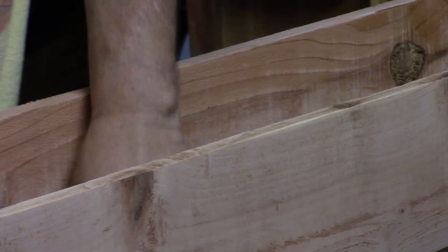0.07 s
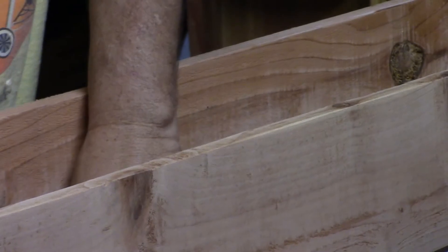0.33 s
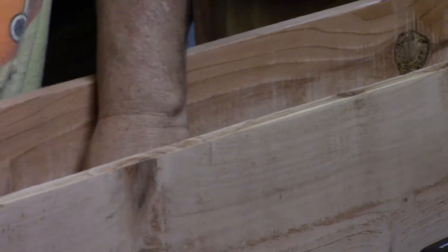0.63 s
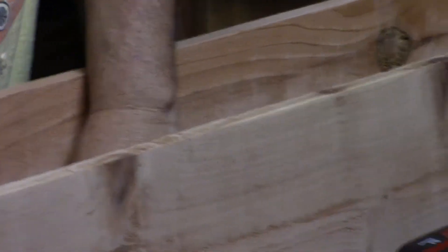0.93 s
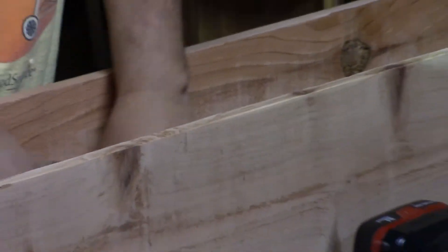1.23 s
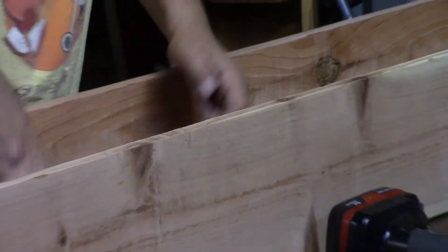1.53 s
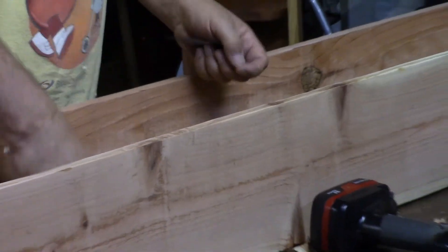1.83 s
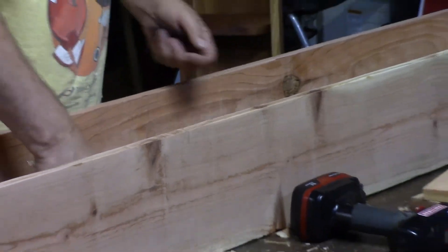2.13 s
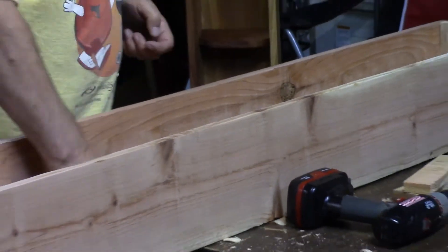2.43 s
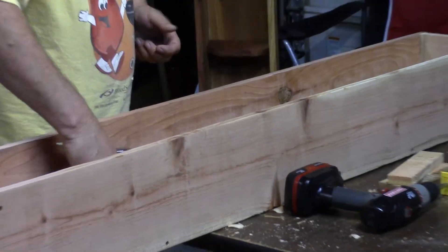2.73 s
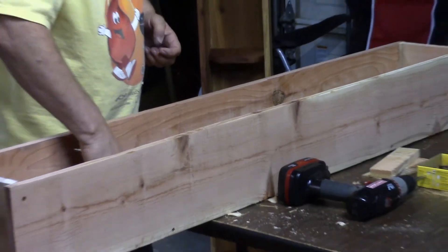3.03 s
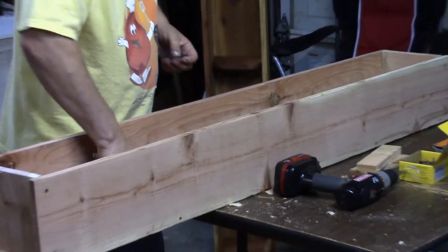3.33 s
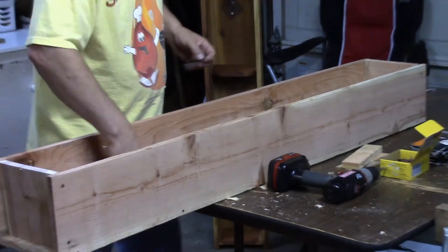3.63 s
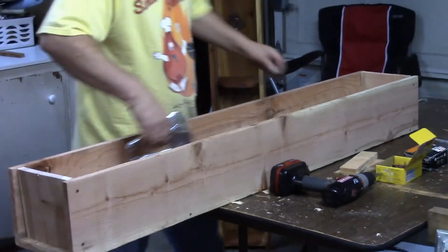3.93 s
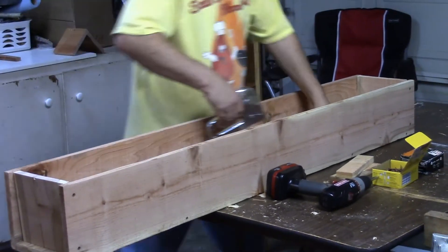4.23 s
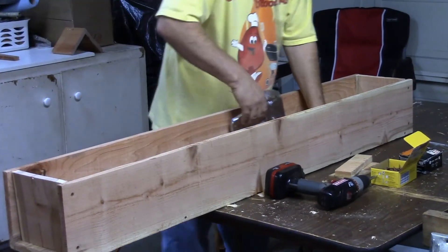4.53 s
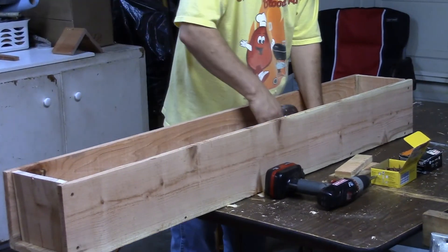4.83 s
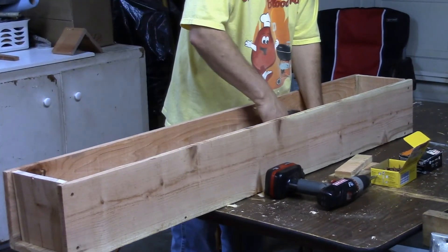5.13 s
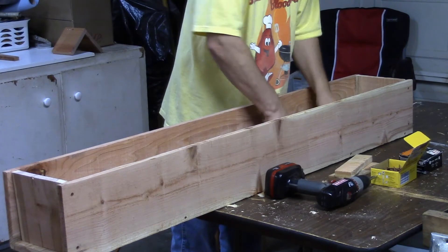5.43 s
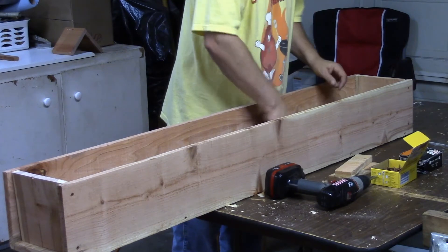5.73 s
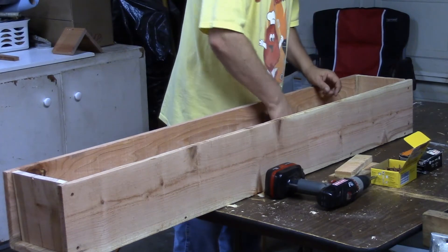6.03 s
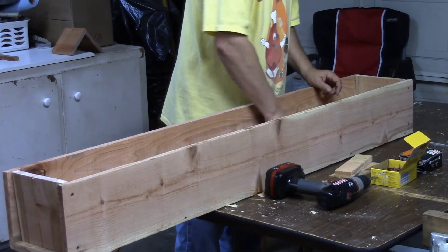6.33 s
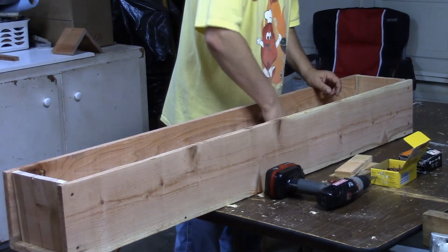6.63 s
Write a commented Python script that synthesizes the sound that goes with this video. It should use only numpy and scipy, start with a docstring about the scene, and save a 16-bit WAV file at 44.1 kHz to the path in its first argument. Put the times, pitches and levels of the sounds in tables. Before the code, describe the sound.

Six loud metallic clacks of a hand stapler hitting wood in a workshop, each followed by a small click of the handle.

```python
"""A hand staple gun fires six staples through netting into a long wooden planter box in a workshop.
The gun is set down, rocks flat and sometimes brushes the box. Each squeeze presses its nose into the
board, the latch slips, the spring slams the staple home and the handle clicks back. The room rings for
about 0.4 s over a faint, steady background noise. The camera's microphone gets quieter as the lens
zooms out, and its limiter (an automatic volume control) flattens the shots."""
import sys
import numpy as np
from scipy import signal
from scipy.fft import rfft, irfft
from scipy.io import wavfile
from scipy.ndimage import uniform_filter1d, minimum_filter1d

SR = 44100
rng = np.random.default_rng(int(sys.argv[2]) if len(sys.argv) > 2 else 0)


def transcribe(signal):
    """Save signal, clipped to [-1, 1], as a 16-bit WAV file at the path in sys.argv[1]."""
    frames = np.atleast_2d(signal).T
    limited = np.clip(frames, -1, 1)
    pcm = np.round(limited * 32767).astype(np.int16)
    wavfile.write(sys.argv[1], SR, pcm)


N = 303849
TIME = np.arange(25600) / SR  # time axis of one hit [s]
HZ = np.fft.rfftfreq(len(TIME), 1 / SR)
RATTLE_LAG_S = 0.0014  # loose steel parts tick this long after the gun meets the wood

# notes the wooden box boosts or swallows: (frequency [Hz], width [Hz], gain [dB])
BOX_NOTES = [(178, 15, 2), (223, 14, -8), (260, 8.4, 1), (259, 9.7, -4.5), (303, 13, 3.5), (473, 60, 1),
             (562, 20, 4), (624, 40, -5.5), (638.5, 26, 5.5), (845, 33, 7), (930, 100, -1), (1067, 34, 9.5),
             (1175, 60, -0.5), (1250, 71, 4.5), (1410, 80, -0.5), (1680, 45, 0)]
# tone of steel striking steel: (frequency [Hz], relative level [dB])
CRACK_TONE = [(40, -45), (120, -28), (300, -13.5), (800, 4), (2000, -11), (3500, 1.5), (5500, -5),
              (7000, -3.5), (9500, 2.5), (12000, -7), (16000, -19.5)]
# tone of the gun's casing meeting wood or its stop: (frequency [Hz], relative level [dB])
CLACK_TONE = [(30, -44), (90, -30), (200, -11), (500, 8.5), (1100, 5.5), (1500, -2.5), (2000, 0.5),
              (2700, -2.5), (3500, -11), (4500, -18), (9000, -31.5), (16000, -43)]


def amp(db):
    """Turns decibels into a factor to multiply by."""
    return 10 ** (np.asarray(db) / 20)


def curve(points, hz=HZ):
    """Joins a table's points with straight lines on a log-frequency axis."""
    point_hz, value = np.transpose(points)
    return np.interp(np.log(hz + 1), np.log(point_hz + 1), value)


def add(mix, start_s, sound):
    """Mixes a sound in at its start time."""
    part = mix[:, round(start_s * SR):][:, :sound.shape[1]]
    part += sound[:, :part.shape[1]]


def colour(sound, db):
    """Gives each frequency in HZ its own gain, so that the ringing follows the hit (minimum phase)."""
    log_gain = np.log(amp(db))
    mirrored = np.concatenate([log_gain, log_gain[-2:0:-1]])
    response = np.exp(np.conj(signal.hilbert(mirrored)))[:len(HZ)]
    return irfft(rfft(sound) * response)


def same_power(db):
    """Shifts a tone curve so that it changes the tone of white noise but not its power."""
    return db - 10 * np.log10(np.mean(amp(db) ** 2))


def bass_treble(low_db, high_db, low_hz, high_hz):
    """A bass knob and a treble knob, as a curve in dB."""
    return low_db / (1 + (HZ / low_hz) ** 2) + high_db * HZ ** 2 / (HZ ** 2 + high_hz ** 2)


def resonances(notes):
    """An object boosts some notes and swallows others: peaks and dips in dB."""
    return sum(db / (1 + (2 * (HZ - hz) / width) ** 2) for hz, width, db in notes)


def ripple(grain_hz, depth_db):
    """Every spot and grip favours other notes: random wiggles in the tone curve, in dB."""
    bell_curve = np.exp(-(np.arange(-400, 401) * HZ[1] / grain_hz) ** 2)
    wiggles = signal.oaconvolve(rng.standard_normal(len(HZ)), bell_curve, "same")
    return depth_db * wiggles / wiggles.std()


def scatter():
    """Noise spectra for a spray of echoes: mid (what both ears share) and side (how they differ)."""
    # stereo width: (frequency [Hz], side level relative to mid [dB])
    width = [(30, -5), (80, -26), (170, -32.5), (400, -32), (1400, -23), (2800, -18.5), (5600, -15.5),
             (10000, -13), (14000, -10.5)]
    spectra = rfft(rng.standard_normal((2, len(TIME))))
    spectra[1] *= amp(curve(width))
    return spectra


def background(level_db=-60, side_db=-14):
    """Steady room noise, nearly the same in both ears."""
    # tone of the room noise: (frequency [Hz], relative level [dB])
    air_tone = [(15, -63.5), (25, -35.5), (92, -21.5), (127, -8.5), (200, -12), (242, -2.5), (277, -10.5),
                (489, -9.5), (1020, -21.5), (1290, -23), (1840, -25.5), (2280, -29), (2910, -28.5),
                (11300, -43.5), (16000, -54.5)]
    hz = np.fft.rfftfreq(N, 1 / SR)
    noise = irfft(rfft(rng.standard_normal((2, N))) * amp(curve(air_tone, hz)), N)
    return amp(level_db) * noise / noise[0].std() * amp([[0], [side_db]])


def room_echo():
    """The room answers a hit: treble builds up quickly, bass swells, each band fades at its own speed."""
    # the workshop's echo: (band centre [Hz], time to fade by 60 dB [s], build-up time [s])
    bands = [(102.6, 0.38, 0.024), (307, 0.46, 0.0049), (780, 0.39, 0.0095), (2240, 0.41, 0.0034),
             (5640, 0.38, 0.0046), (10400, 0.31, 0.0017), (15000, 0.3, 0.0032)]
    spectra, echo = scatter(), 0
    centres = [row[0] for row in bands]
    for share, (_, fade_s, rise_s) in zip(np.eye(len(bands)), bands):
        band = irfft(spectra * curve(np.c_[centres, share]))
        echo += band * (1 - np.exp(-TIME / rise_s)) * amp(-60 * TIME / fade_s)
    return echo


def chatter(rise_s, decay_s):
    """Parts chatter against each other, making a short burst of noise."""
    shape = (1 - np.exp(-(TIME / rise_s) ** 2)) * np.exp(-TIME / decay_s)
    return irfft(scatter()) * shape / shape.max()


def wood_knock(note_hz, note_db, boom_db, treble_db):
    """A blunt touch shakes mostly the boards' low notes; the spot it hits boosts or dulls one."""
    # tone of a knock on wood: (frequency [Hz], relative level [dB])
    knock_tone = [(30, -40.5), (80, -27.5), (160, -3), (280, 1), (480, -1), (750, -6), (1200, -18.5),
                  (2500, -22), (4000, -35.5), (10000, -38), (16000, -48.5)]
    body_db = same_power(curve(knock_tone) + resonances(BOX_NOTES))
    spot_db = resonances([(note_hz, 45, note_db)]) + ripple(grain_hz=39.54, depth_db=2.5)
    blow = room_echo() + amp(-6) * chatter(rise_s=0.0015, decay_s=0.014)
    return colour(blow, body_db + spot_db + bass_treble(boom_db, treble_db, low_hz=300, high_hz=1190))


def steel_ring(detune=0.004, spread_db=0.5):
    """The gun's steel body and spring ring; the grip shifts their notes a little on every hit."""
    # notes of the steel: (frequency [Hz], level [dB], time to fade by 60 dB [s])
    steel_notes = [(1314, -16.5, .35), (1478, -27.5, 0.67), (1683, -23.5, 0.37), (1839, -25.5, 0.36),
                   (2310, -23.5, 0.18), (2673, -19, 0.26), (3114, -23.5, 0.46), (3180, -26.5, 0.43),
                   (3430, -19.5, 0.31), (4020, -31, 0.54), (4440, -29, 0.31)]
    hz, db, fade_s = np.transpose(steel_notes)[:, :, None]
    shift, size, phase = rng.standard_normal((len(steel_notes), 3)).T[:, :, None]
    loudness = amp(db + spread_db * size) * amp(-60 * TIME / fade_s)
    notes = loudness * np.sin(2 * np.pi * (hz * (1 + detune * shift) * TIME + phase))
    return np.outer([1, 0], notes.sum(0) * (1 - np.exp(-TIME / 0.001)))  # mid only


def steel_click(low_db, treble_db, tick_db, ring_db=-8):
    """Steel parts touch lightly: a tick through the handle, its echo and a faint ring."""
    # tone of the click's echo: (frequency [Hz], relative level [dB])
    click_tone = [(60, -32.5), (200, -12), (500, 1), (900, -4), (1400, -3.5), (2500, -1.5), (4500, -3.5),
                  (8000, -5), (11000, -9), (16000, -26)]
    # notes the handle boosts or swallows: (frequency [Hz], width [Hz], gain [dB])
    handle_notes = [(1350, 220, 6), (1700, 230, -4), (2000, 130, 2), (2350, 310, 3), (3100, 110, 1),
                    (3470, 95, 2), (5030, 300, -2.5), (8600, 78, 2), (9900, 300, 2.5)]
    handle_db = resonances(handle_notes)
    grip_db = ripple(grain_hz=110, depth_db=2.5)
    tilt_db = bass_treble(low_db, treble_db, low_hz=1500, high_hz=5000)
    echo = colour(room_echo(), same_power(curve(click_tone) + handle_db) + grip_db + tilt_db)
    contact = chatter(rise_s=0.0014, decay_s=0.0053)
    tick = colour(contact, same_power(curve(CRACK_TONE) + handle_db) + grip_db)
    return echo + amp(tick_db) * tick + amp(ring_db) * steel_ring()


def ping(hz, decay_s=0.0035):
    """One note of the gun's casing that dies away quickly."""
    note = np.sin(2 * np.pi * hz * TIME) * (1 - np.exp(-TIME / 0.001)) * np.exp(-TIME / decay_s)
    return np.outer([1, 0], note)  # mid only


def casing_clack(ping_hz, direct_db=4, ping_db=11, ring_db=1):
    """The casing meets wood: a hard clack, a ping and a trace of ringing steel."""
    blow = room_echo() + amp(direct_db) * chatter(rise_s=0.0013, decay_s=0.0033)
    hit = colour(blow, same_power(curve(CLACK_TONE)) + ripple(grain_hz=90, depth_db=3.0))
    return hit + amp(ping_db) * ping(ping_hz) + amp(ring_db) * steel_ring()


def setting_down():
    """One edge touches the board, then the gun rocks flat with a clack; loose parts tick both times."""
    # the gun meeting the board: (time [s], rocking time [s], touch knock [dB], touch tick [dB],
    # landing knock [dB], landing tick [dB], clack [dB], ping [Hz], bass gain [dB],
    # note of the spot [Hz], gain of that note [dB])
    set_downs = [(.2, 0.037, -53, -74.5, -48.5, -70.5, -64, 2360, 12.5, 240, 6),
                 (0.57, 0.013, -50.5, -66.5, -27.5, -35.5, -47.5, 2440, -6.5, 400, 15),
                 (1.38, .0555, -48, -75.5, -39.5, -53, -51, 2380, 10.5, 245, 7.5),
                 (2.148, .016, -31, -55, -28, -49, -43.5, 2430, 4.5, 252, 9.5),
                 (3.362, 0.0051, -40.5, -49, -34.5, -60.5, -59.5, 2100, -3, 750, 6.5),
                 (5.433, 0.034, -36.5, -61, -22.5, -38.5, -39, 1290, -4.5, 440, -11),
                 (6.114, .022, -25, -45.5, -19.5, -36, -40, 900, -1.5, 440, 10),
                 (6.707, .0073, -26, -47.5, -22, -32.5, -23.5, 2650, 3, 390, 2.5)]
    out = np.zeros((2, N))
    for (at_s, rock_s, touch_db, touch_tick_db, land_db, land_tick_db,
         clack_db, ping_hz, boom_db, note_hz, note_db) in set_downs:
        add(out, at_s, amp(touch_db) * wood_knock(note_hz, note_db, boom_db, treble_db=-3.5))
        touch_tick = steel_click(low_db=5.5, treble_db=-1.5, tick_db=5)
        add(out, at_s + RATTLE_LAG_S, amp(touch_tick_db) * touch_tick)
        landing = wood_knock(note_hz, note_db, boom_db, treble_db=-4.5)
        add(out, at_s + rock_s, amp(land_db) * landing + amp(clack_db) * casing_clack(ping_hz))
        land_tick = steel_click(low_db=-2, treble_db=-2.5, tick_db=-0.5)
        add(out, at_s + rock_s + RATTLE_LAG_S, amp(land_tick_db) * land_tick)
    return out


def bumps():
    """The gun brushes the box as it is moved: wood knocks, the casing clacks, loose parts tick."""
    # glancing hits: (time [s], knock [dB], tick [dB], clack [dB], ping [Hz], note of the spot [Hz])
    touches = [(0.397, -60.5, -73.5, -54, 1670, 300), (0.9602, -39, -41, -38, 2430, 720),
               (1.563, -48.5, -61, -62, 2390, 300), (2.218, -43, -49, -47, 2470, 250),
               (3.007, -49.5, -84.5, -78, 1700, 245), (4.2236, -48.5, -83.5, -50.5, 923, 418)]
    out = np.zeros((2, N))
    for at_s, knock_db, tick_db, clack_db, ping_hz, note_hz in touches:
        wood = wood_knock(note_hz, note_db=7, boom_db=-2.5, treble_db=-6.5)
        casing = casing_clack(ping_hz, direct_db=3.5, ping_db=3, ring_db=-3)
        add(out, at_s, amp(knock_db) * wood + amp(clack_db) * casing)
        add(out, at_s + RATTLE_LAG_S, amp(tick_db) * steel_click(low_db=6, treble_db=-4.5, tick_db=1))
    return out


def small_body(loss_db=-24, corner_hz=240):
    """The gun is too small to give off much bass by itself: a bass cut in dB."""
    return loss_db / (1 + (HZ / corner_hz) ** 2)


def shot(thump_db, treble_db, crack_db, ring_db):
    """The driver, a steel blade, slams the staple home: steel cracks and rings, box and room boom."""
    # tone of the shot as it fills the room: (frequency [Hz], relative level [dB])
    boom_tone = [(18, -74), (30, -48.5), (95, -33.5), (170, -12), (328, -5.5), (437, -0.5), (649, -9),
                 (760, -7), (1190, -14.5), (2610, -11), (3770, -14.5), (6550, -15), (9970, -17.5),
                 (14400, -30.5), (16000, -46)]
    body_db = same_power(curve(boom_tone) + resonances(BOX_NOTES))
    grip_db = ripple(grain_hz=45.76, depth_db=1.9)
    tilt_db = bass_treble(thump_db, treble_db, low_hz=696, high_hz=4000)
    boom = colour(room_echo(), body_db + grip_db + tilt_db)
    strike = chatter(rise_s=0.003, decay_s=0.0096)
    steel_db = same_power(curve(CRACK_TONE)) + small_body() + ripple(grain_hz=250, depth_db=1.0)
    return boom + amp(crack_db) * colour(strike, steel_db) + amp(ring_db) * steel_ring()


def stapling(bite_lead_s=0.038, latch_lead_s=0.014, release_lead_s=0.0013, bite_db=5, release_db=-21):
    """The nose bites the board, the latch slips, the driver is let go and hits, the handle returns."""
    # one row per staple: (time [s], strength [dB], thump gain [dB], treble gain [dB], crack gain [dB],
    # ring gain [dB], squeeze [dB], handle held [s], handle return [dB], its bass gain [dB],
    # its ping gain [dB])
    staples = [(0.6309, -5, 5, 1, 0, 0, -41, 0.25, -34, 4.5, 2),
               (1.6447, -1, -1.5, -3.5, -2.5, 0, -42.5, .204, -31, 17.5, 3),
               (2.374, -10, -0.5, -2, -4, 1, -35.5, .23, -42, 4, -3),
               (3.4786, -4, -2.5, -3.5, -3.5, 0.5, -39.5, 0.22, -33, 4.5, 4),
               (5.597, -4, -5, -6.5, -5, 2.5, -39.5, .2205, -34.5, 0.5, 8),
               (6.2793, -3, -4, -6.5, -4.5, 0, -37.5, 0.2, -37.5, 6, 17.5)]
    out = np.zeros((2, N))
    for (at_s, strength_db, thump_db, treble_db, crack_db, ring_db,
         squeeze_db, held_s, return_db, jolt_db, ping_db) in staples:
        bite = wood_knock(note_hz=453, note_db=5.5, boom_db=-9, treble_db=0)
        latch = steel_click(low_db=9, treble_db=2.5, tick_db=1.5)
        slip = chatter(rise_s=0.0028, decay_s=0.002)
        release = colour(slip, same_power(curve(CLACK_TONE)) + small_body())
        handle = steel_click(jolt_db, treble_db=-1.5, tick_db=4.5)
        handle += amp(ping_db) * ping(hz=1360, decay_s=0.006)  # it hits its stop
        add(out, at_s - bite_lead_s, amp(squeeze_db + bite_db) * bite)
        add(out, at_s - latch_lead_s, amp(squeeze_db) * latch)
        add(out, at_s - release_lead_s, amp(strength_db + release_db) * release)
        add(out, at_s, amp(strength_db) * shot(thump_db, treble_db, crack_db, ring_db))
        add(out, at_s + held_s, amp(return_db) * handle)
    return out


def scene():
    """Adds up all the sounds and turns mid and side into left and right."""
    mid, side = stapling() + setting_down() + bumps() + background()
    return np.array([mid + side, amp(0.25) * (mid - side)])


def smooth(x, seconds):
    """Follows a changing value with a lag, evening out quick jumps."""
    memory = np.exp(-1 / (seconds * SR))
    return signal.lfilter([1 - memory], [1, -memory], x)


def record(dry, limit_db=-12, release_db_per_s=220, attack_s=0.0012, ceiling=0.92, hiss_db=-89.5):
    """The microphone follows the zoom, adds hiss, turns loud hits down and trims the lows and highs."""
    # microphone gain as the lens zooms: (time [s], gain [dB])
    zoom = [(0, 11.5), (1.2, 12.5), (2.1, 11), (2.4, 7), (2.8, 0.5), (3.5, -1), (4.2, 1.5), (6.9, -5.5)]
    lowest_hz, highest_hz = 45, 15900
    t = np.arange(N) / SR
    x = dry * amp(np.interp(t, *np.transpose(zoom))) + amp(hiss_db) * rng.standard_normal(N)
    # take away most of the level above the limit, then recover at a steady rate
    power_db = 10 * np.log10(smooth((x ** 2).mean(0), seconds=0.0051) + 1e-12)
    fall_db = release_db_per_s * t
    held_db = np.maximum.accumulate(power_db + fall_db) - fall_db
    over_db = np.maximum(held_db - limit_db, 0)
    x = x / amp(0.91 * smooth(over_db, seconds=attack_s))
    # catch the sharp peaks that slip past
    peak_gain = np.minimum(1, ceiling / (abs(x).max(0) + 1e-9))
    x = x * uniform_filter1d(minimum_filter1d(peak_gain, size=31), size=31)
    x = signal.sosfilt(signal.butter(2, lowest_hz, "high", fs=SR, output="sos"), x)
    treble_cut = signal.firwin(401, highest_hz, window=("kaiser", 8), fs=SR)
    return signal.oaconvolve(x, treble_cut[None], "same")


dry = scene()
out = record(dry)
transcribe(out)
```